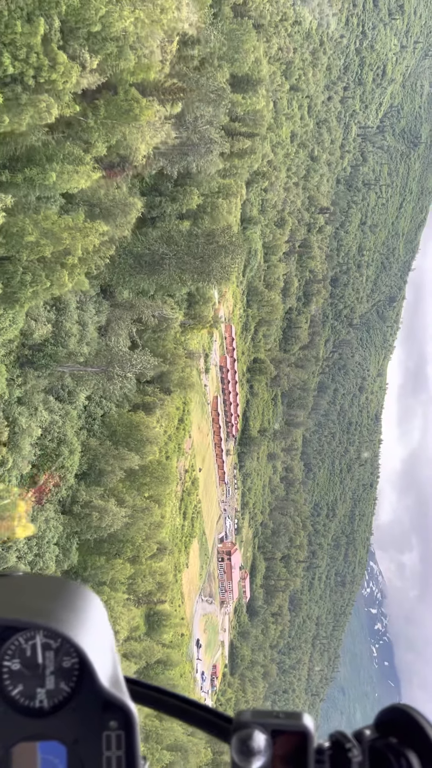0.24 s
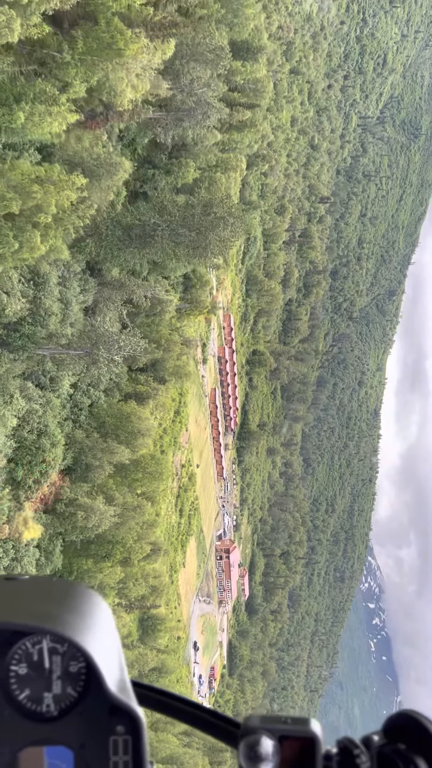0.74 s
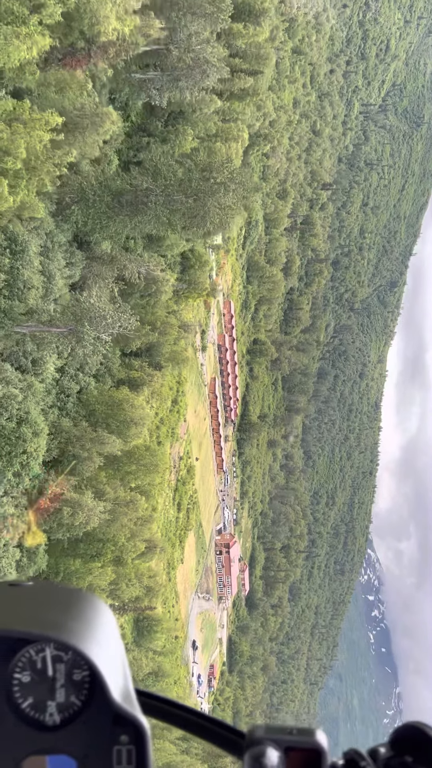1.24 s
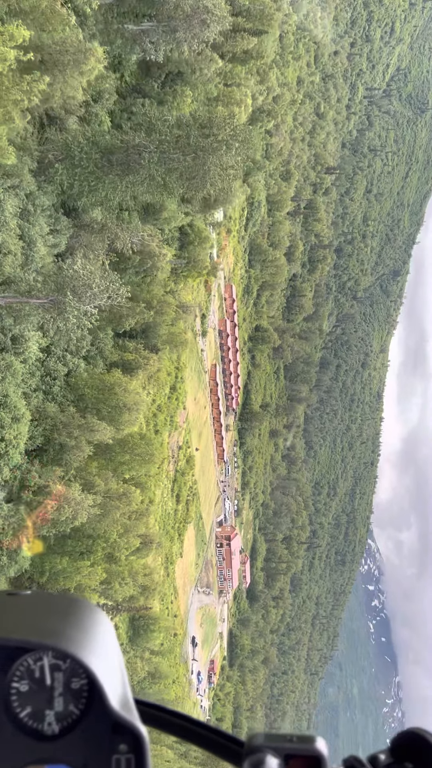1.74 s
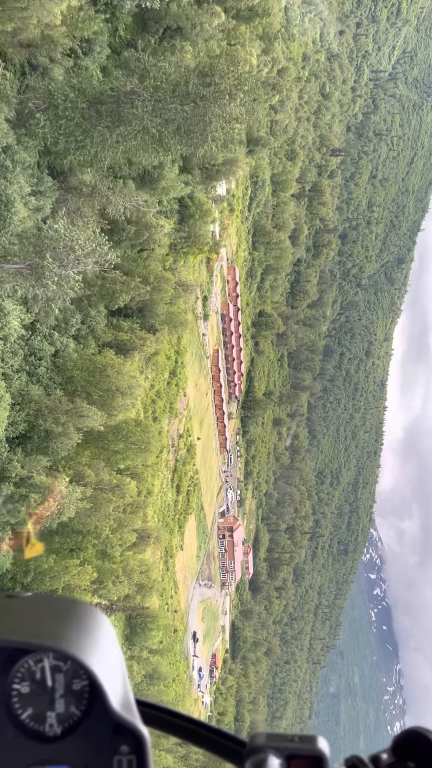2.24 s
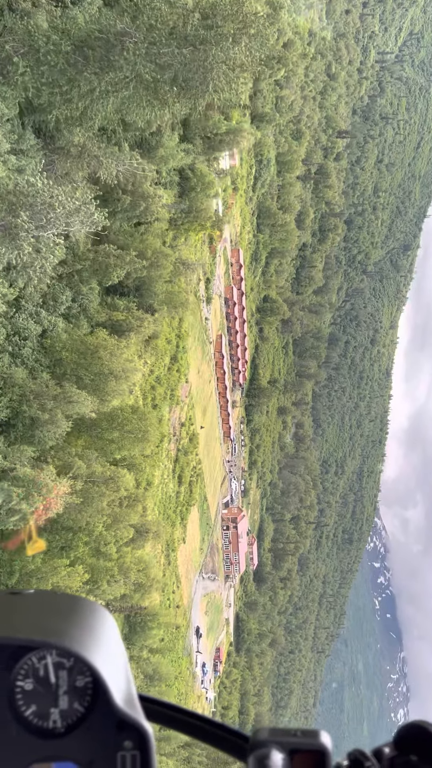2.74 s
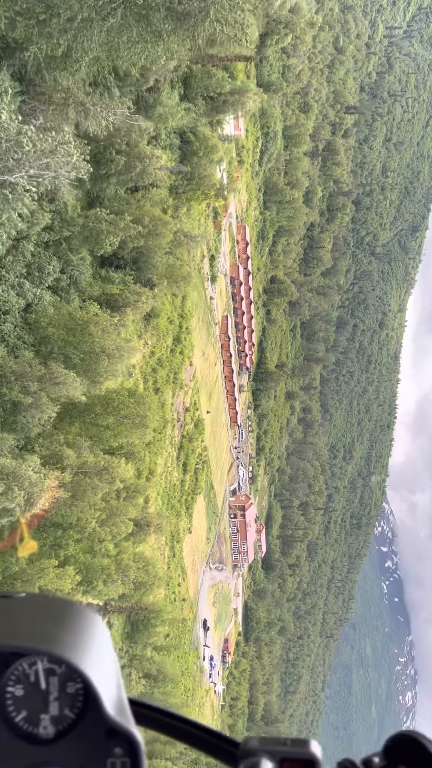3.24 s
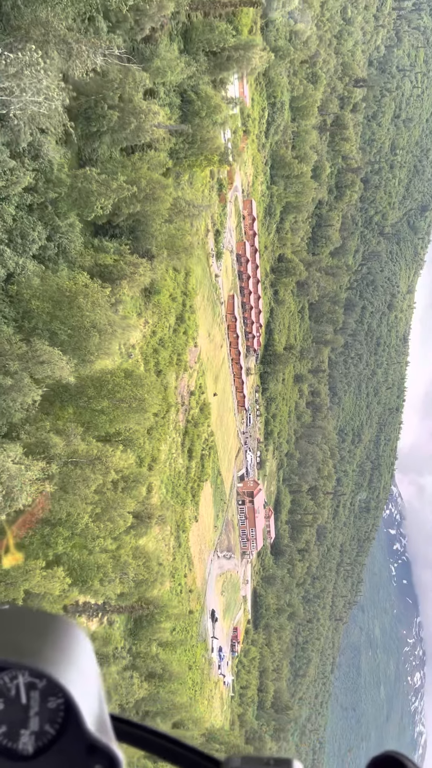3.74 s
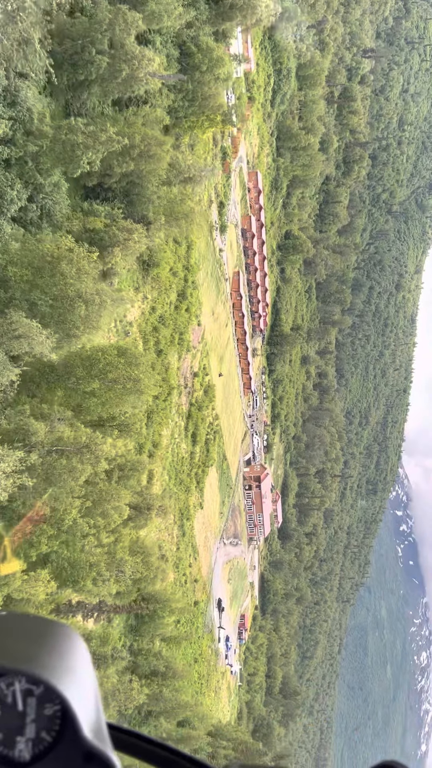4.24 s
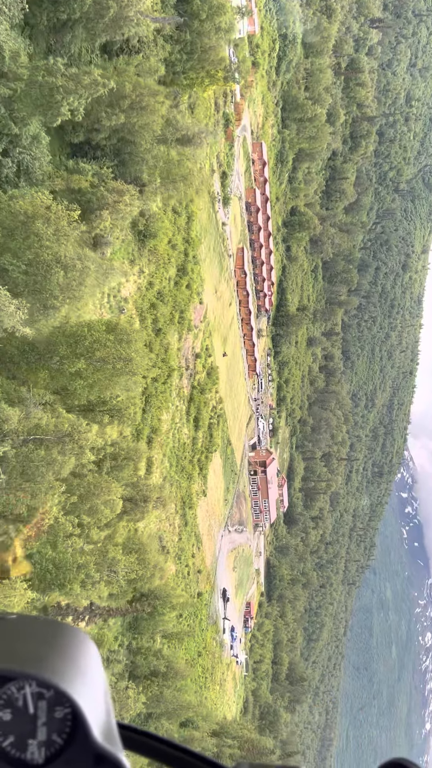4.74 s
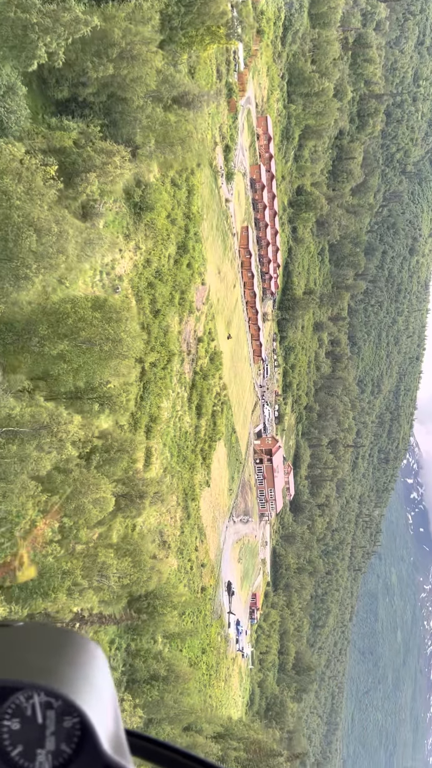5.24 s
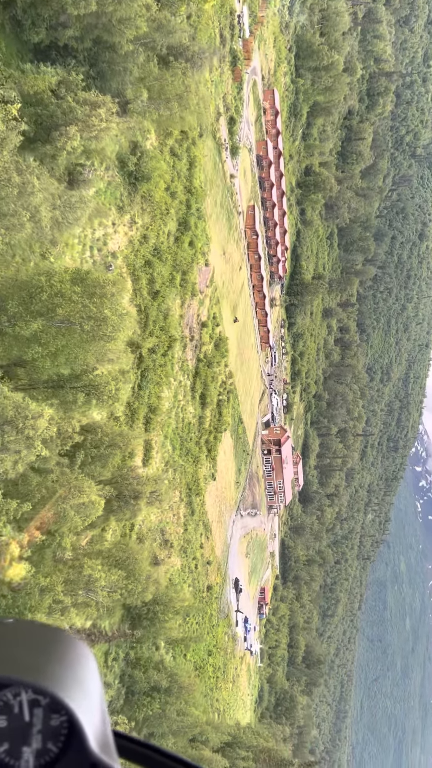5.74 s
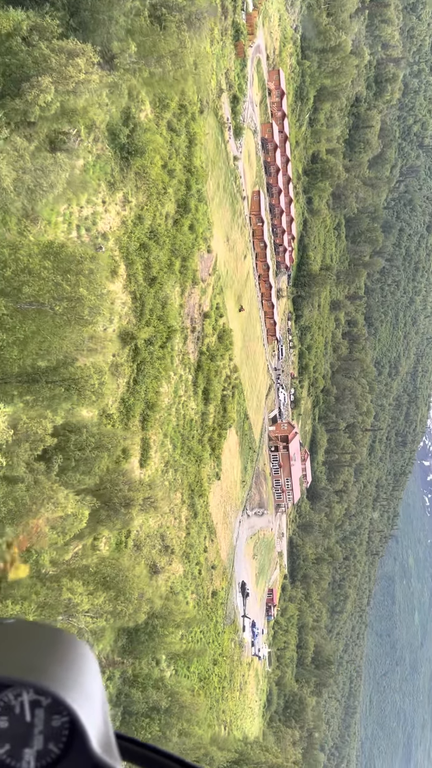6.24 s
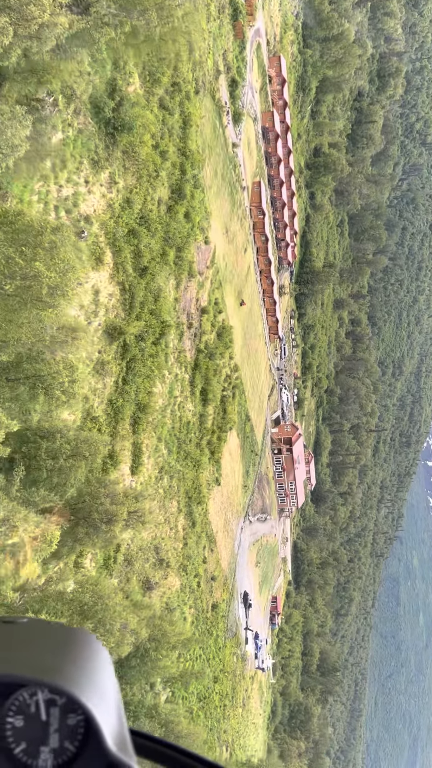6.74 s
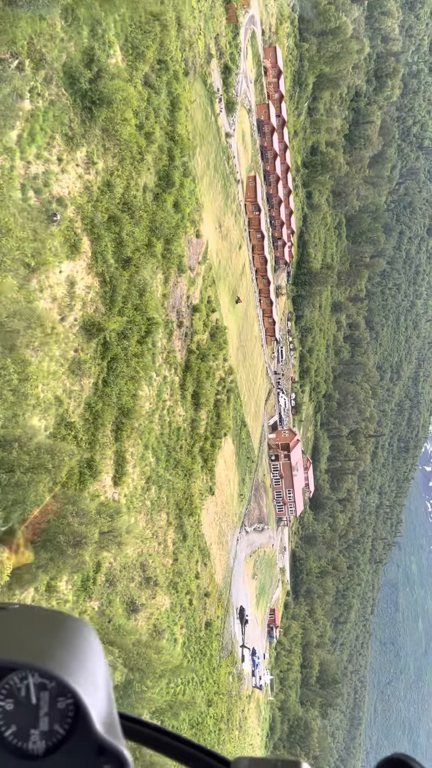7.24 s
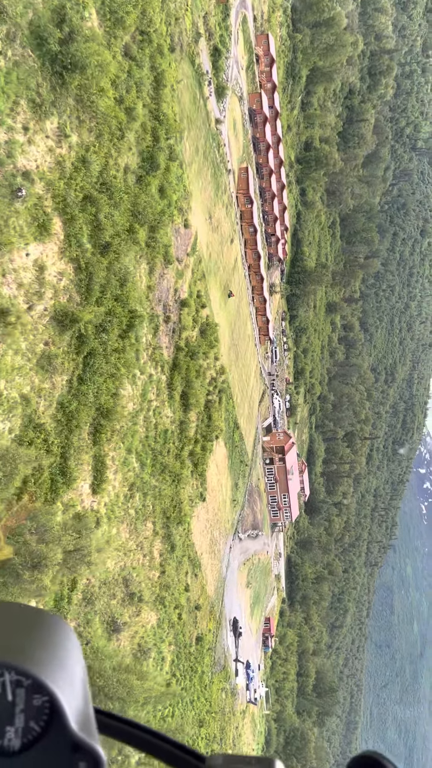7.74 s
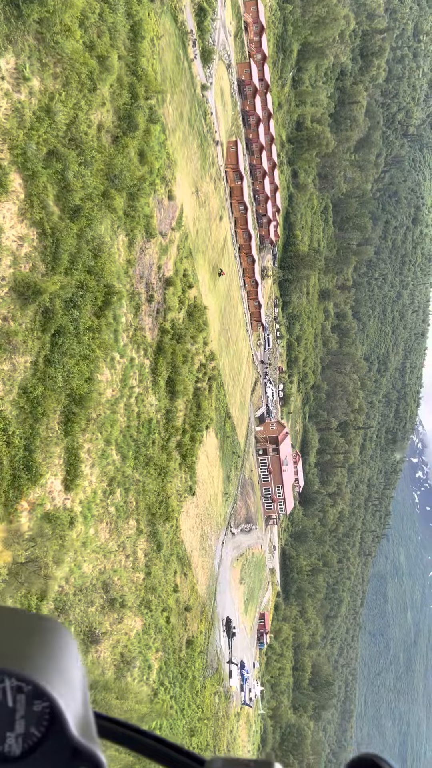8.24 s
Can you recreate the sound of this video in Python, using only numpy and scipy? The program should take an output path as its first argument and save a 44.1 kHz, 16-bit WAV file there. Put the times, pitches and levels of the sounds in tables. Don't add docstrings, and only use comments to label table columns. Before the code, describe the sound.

From 0 s we are in the cabin of a small piston helicopter, heard through a phone's two microphones. A loud, almost unchanging low engine hum dominates, roughened by fast rotor pulses, with a steady gear whine, faint high electrical whine, rapidly chattering panels and a low roar of turbulent air. Little changes at first; very faint blade slaps start around 2.5 s, and a longer rattle jolt comes near 3.1 s. At about 3.4 s power eases, and from about 3.8 s regular slaps, roughly thirteen or fourteen a second, become clear: hollow thumps with canopy ring and brief bright cracks. Their strength varies, with a strong burst and panel knocks around 6.3-6.5 s, then heavier runs near 7.1-7.5 s and 8.1 s. The low thumps deepen steadily while the engine pitch holds. It stops about 8.5 s, still in flight.

```python
import sys
import numpy as np
from scipy import signal
from scipy.fft import rfft, irfft, next_fast_len
from scipy.io import wavfile
from scipy.ndimage import uniform_filter1d, map_coordinates

SR = 44100
rng = np.random.default_rng(int(sys.argv[2]) if len(sys.argv) > 2 else 0)


def put_to_file(sound):
    columns = np.atleast_2d(sound).T
    safe = np.clip(columns, -1, 1)
    whole_steps = np.round(safe * 32767)
    wavfile.write(sys.argv[1], SR, whole_steps.astype(np.int16))


def decibels_to_gain(level_db):
    exponent = np.asarray(level_db, float) / 20
    return 10 ** exponent


N = 374850

# (time [s], level [dB])
FIRING_TONE = [(0.0, -15.5), (0.21, -16.5), (0.95, -14.5), (2.06, -15.5), (2.77, -13.5), (2.91, -13.5),
               (3.15, -17.5), (3.27, -14.5), (3.38, -17), (3.69, -15), (4.61, -16), (4.73, -18.5),
               (4.88, -16.5), (5.66, -17.5), (6.77, -15.5), (8.38, -16.5), (8.5, -21)]
FIRINGS_PER_BLADE, CYLINDERS = 10, 6
FLARE_S = 3.36
EVEN_SLAP_DB = -22


def unit(x):
    return x / np.sqrt(np.mean(x ** 2) + 1e-20)


def along(points, hz, column=1):
    table = np.transpose(points)
    return np.interp(np.log(hz + 1), np.log(table[0] + 1), table[column])


def curve(rows):
    s, values = np.transpose(rows)
    return np.interp(np.arange(N) / SR, s, values)


def flare(before, after):
    takes_s = 0.11
    return before + (after - before) / (1 + np.exp((FLARE_S - np.arange(N) / SR) / takes_s))


def wobble(rate):
    return map_coordinates(rng.standard_normal(int(N * rate / SR) + 4), [np.arange(N) * rate / SR])


def filtered(x, response):
    m = next_fast_len(N + SR // 2)
    tail = x[..., :-SR // 10:-1] * np.linspace(1, 0, SR // 10 - 1)
    x = np.concatenate([x, tail], axis=-1)
    return irfft(rfft(x, m) * response(np.fft.rfftfreq(m, 1 / SR)), m)[..., :N]


def resonances(modes):
    def response(f):
        total = 0
        for k, (centre, width, db) in enumerate(modes):
            damping = 1j * f * width
            total = total + (-1) ** k * decibels_to_gain(db) * damping / (centre ** 2 - f ** 2 + damping + 1e-9)
        return total
    return response


def orders(turns, table, drift_db, drift_rad):
    knots = np.arange(0, N + SR, SR // 3)
    total = np.zeros(N)
    for k, db in table:
        size, shift = [np.interp(np.arange(N), knots, rng.standard_normal(len(knots))) for _ in "ab"]
        angle = 2 * np.pi * (k * turns + rng.random()) + drift_rad * shift
        total += decibels_to_gain(db + 2.5 + drift_db * size) * np.cos(angle)
    return total


def airflow():
    # (frequency [Hz], density [dB per Hz])
    roar = [(22, -77), (32, -65.5), (42, -52.5), (60, -54.5), (130, -47.5), (230, -43.5), (300, -54.5),
            (500, -63), (650, -63), (820, -62.5), (1000, -67), (1300, -83.5), (1700, -82.5), (3000, -100)]
    z = signal.stft(rng.standard_normal((2, N)), nperseg=2048)[2]
    patches = rng.standard_normal(z.shape[1:])
    patches = uniform_filter1d(uniform_filter1d(patches, 5, 0), 5, 1)
    noise = unit(signal.istft(z * decibels_to_gain(1.8 * unit(patches)), nperseg=2048)[1][:, :N])
    return decibels_to_gain(flare(-2.5, -2.27)) * filtered(noise, lambda hz: np.sqrt(SR / 2) * decibels_to_gain(along(roar, hz)))


def rattle(firings):
    # (frequency [Hz], density [dB per Hz])
    panel_colour = [(600, -18.5), (1200, 13.5), (1900, 1), (2600, 5.5), (3400, 3), (4200, -3), (5000, -4),
                    (6500, -2), (8400, -3.5), (10000, -13.5), (11700, -0.5), (12600, -8), (14900, -2),
                    (15300, -13.5)]
    # (frequency [Hz], width [Hz], level [dB])
    trim = [(1920, 13, -5.5), (2423, 27, 0), (2925, 19, -2.5), (3610, 28, -1), (3940, 66, -10.5),
            (4810, 70, -5.5), (5580, 68, -11), (7300, 88, -5), (7400, 47, -14), (8850, 34, -11.5)]
    # (time [s], level [dB], length [s])
    jolts = [
        (0.1, -3, 0.11),
        (0.455, 1, 0.049),
        (3.115, 3, .15),
        (3.607, -1, 0.099),
        (3.708, 4, 0.018),
        (3.929, 3, 0.048),
        (5.534, -1.5, 0.033),
        (6.322, 5, 0.044),
        (6.461, 5, 0.017),
        (7.558, 0.5, 0.34),
    ]
    t = np.arange(N) / SR
    tone_db = curve(FIRING_TONE)
    level_db = flare(-58, -58.5) + 0.35 * (tone_db - tone_db.mean())
    for s, db, length in jolts:
        level_db += db * np.exp(-((t - s) / length) ** 2)
    cam = 2 * np.pi * (firings - .3) / CYLINDERS
    blade = 2 * np.pi * (firings - 3.6) / FIRINGS_PER_BLADE
    shake = 0.9 * np.cos(cam) + 1.1 * np.cos(2 * cam) + 0.13 * np.cos(4 * cam)
    shake += 0.43 * np.cos(cam) * np.cos(blade) + .5 * np.cos(blade)
    loose = decibels_to_gain(.6 * wobble(12) + 1.4 * wobble(30) + .6 * wobble(90))
    sharpness = flare(1.5, 1.1)
    gate = decibels_to_gain(1.22 * sharpness * shake) * loose
    fade = np.exp(-1 / (0.0015 * SR))
    gate = signal.lfilter([1 - fade], [1, -fade], gate ** 0.95) * decibels_to_gain(1.7 * wobble(600))

    def colour(hz):
        singing = sum(1.3 / (1 + (2 * (hz - c) / w) ** 2) * decibels_to_gain(0.37 * db) for c, w, db in trim)
        return decibels_to_gain(along(panel_colour, hz)) * (1 + singing)

    buzz = unit(filtered(gate * rng.standard_normal((2, N)), colour))
    return decibels_to_gain(level_db + 10) * buzz


def valve_train(firings):
    # (firing multiple [1], level [dB rms])
    valves = [(4, -56), (8, -63), (9, -66), (10, -67)]
    return orders(firings, valves, drift_db=2, drift_rad=4)


def gearbox(firings):
    # (mesh multiple [1], level under the mesh tone [dB])
    mesh_harmonics = [(1, 5.5), (2, -32), (3, -31)]
    # (frequency [Hz], level [dB rms])
    electric = [(9464, -83.5), (9736, -73.5)]
    teeth = 57
    turns = firings / FIRINGS_PER_BLADE / 2
    wander = .4 * wobble(5) + .3 * np.sin(2 * np.pi * turns)
    angle = 2 * np.pi * teeth * turns + wander
    mesh = sum(decibels_to_gain(db) * np.cos(k * angle) for k, db in mesh_harmonics)
    whine = sum(decibels_to_gain(db) * 2 ** .5 * np.cos(2 * np.pi * hz * np.arange(N) / SR) for hz, db in electric)
    uneven_db = .6 * np.sin(2 * np.pi * turns + 3.1) + .6 * wobble(6.4)
    return decibels_to_gain(flare(-42, -44.5) + 8 + uneven_db) * mesh + whine


def rotor(firings):
    # (blade-pass multiple [1], level [dB rms])
    blade_harmonics = [(2, -61), (3, -39.5), (4, -35.5), (6, -41.5), (7, -40.5), (8, -54.5), (9, -37.5),
                       (11, -38), (12, -32), (13, -56.5), (14, -47), (16, -41), (17, -58), (18, -59),
                       (19, -47.5), (21, -52), (22, -45.5), (23, -60), (24, -47), (26, -44), (27, -46),
                       (28, -46), (29, -55.5)]
    # (thirds of the blade rate [1], level [dB rms])
    between_tones = [(13, -50.5), (17, -38.5), (47, -40), (52, -38.5)]
    blades = firings / FIRINGS_PER_BLADE
    pressed = orders(blades, blade_harmonics, drift_db=2, drift_rad=.5)
    return pressed + orders(blades / 3, between_tones, drift_db=2.5, drift_rad=.5)


def cabin_thump(starts, wake_db):
    # (frequency [Hz], level [dB], t60 [s])
    air_modes = [(108, -10.5, 0.23), (173, -6, 0.043), (198, 3.5, .1), (258.2, -3, 0.072),
                 (321.8, 6, 0.039), (349, -2, 0.08)]
    deep_hz, deepens_db_per_s = 230, 1.13
    late = round(.002 * SR)
    t = np.arange(SR // 8) / SR
    hz, level_db, t60 = np.transpose(air_modes)[:, :, None]
    ringing = -decibels_to_gain(level_db - 60 * t / t60) * np.sin(2 * np.pi * hz * t) * (1 - np.exp(-t / .004))
    thump_db = flare(-28.5, -16.5)[starts] + 0.42 * (wake_db - EVEN_SLAP_DB)
    push = np.zeros(N + SR)
    for at, db in zip(starts, thump_db):
        deepening = decibels_to_gain((hz < deep_hz) * deepens_db_per_s * (at / SR - FLARE_S))
        push[at + late:][:len(t)] += decibels_to_gain(db) * np.sum(ringing * deepening, axis=0)
    return push[:N]


def canopy_slap(starts, slap_db):
    # (delay [s], level [dB])
    echoes = [(.0037, -4), (.0085, -9.5), (.013, -9), (.019, -13), (.026, -21)]
    # (frequency [Hz], width [Hz], level [dB])
    canopy_modes = [(332, 132, 0), (468, 76, 2), (542, 53, 4), (794, 88, 3.5), (1107, 134, -6.5),
                    (1300, 206, -12.5), (1775, 390, -25)]
    crack_late, crack_t60_s = round(.003 * SR), 0.055
    t = np.arange(SR // 8) / SR
    ring, crack = np.zeros((2, 2, N + SR))
    for at, db in zip(starts, slap_db):
        pulses = decibels_to_gain(-29 - 60 * t / .09) * rng.standard_normal((2, len(t)))
        pulses[:, 0] = 1
        for delay, echo_db in echoes:
            place = round((delay + rng.normal(0, .00012)) * SR)
            pulses[:, place] += decibels_to_gain(echo_db + rng.normal(0, 1, 2))
        ring[:, at:at + len(t)] += decibels_to_gain(db) * pulses
        hiss = decibels_to_gain(-60 * t / crack_t60_s) * rng.standard_normal((2, len(t)))
        crack_db = -45 + 1.5 * (db - EVEN_SLAP_DB)
        crack[:, at + crack_late:][:, :len(t)] += decibels_to_gain(crack_db) * (2 * pulses + hiss)
    canopy = lambda hz: resonances(canopy_modes)(hz) / (1 + 1j * hz / 3000)
    bright = lambda hz: resonances([(2100, 2200, 0)])(hz) ** 3
    return decibels_to_gain(35) * filtered(ring[:, :N], canopy) + filtered(crack[:, :N], bright)


def slaps(firings):
    # (time [s], slap peak [dB])
    wake = [(2.4, -28.5), (3.7, -31), (3.95, -18), (4.18, -23), (4.4, -19.5), (4.75, -24), (5.3, -21.5),
            (5.85, -21), (6.31, -14.5), (6.55, -27.5), (7.12, -17.5), (7.27, -18), (7.42, -17), (7.7, -20),
            (7.82, -33.5), (8.12, -15.5), (8.27, -30.5), (8.4, -21.5)]
    # (time [s], level [dB])
    strays = [(3.81, 2.5), (4.105, -1.5), (4.25, 3), (4.325, 3), (5.51, 2), (5.73, 3.5), (5.875, -2.5),
              (6.02, -2), (6.17, -4), (6.315, -0.5), (6.61, 4.5), (7.125, 3.5), (7.27, -1.5), (7.345, 2),
              (7.64, -2.5), (7.715, 4.5), (7.94, 3.5), (8.155, 5), (8.23, -4.5), (8.375, 2.5)]
    first_pass, last_pass = 33, 114
    slap_at_firing, slip_per_pass = 7.8, .012
    jitter_s = .0005
    high_blade_db = 1.5
    passes = np.arange(first_pass, last_pass + 1)
    due = passes * FIRINGS_PER_BLADE + slap_at_firing + slip_per_pass * (passes - first_pass)
    starts = np.searchsorted(firings, due)
    starts = starts + np.round(jitter_s * SR * rng.standard_normal(len(starts))).astype(int)
    wake_db = curve(wake)[starts]
    slap_db = wake_db - high_blade_db * (-1) ** passes
    for s, db in strays:
        slap_db[np.abs(starts - s * SR).argmin()] += db
    return cabin_thump(starts, wake_db) + canopy_slap(starts, slap_db)


def engine(firings):
    # (crank order [1], level [dB rms])
    crank_orders = [(1, -34.5), (1.5, -36), (2, -42.5), (2.5, -53.5), (3.5, -29.5), (4, -37), (4.5, -34.5),
                    (5, -42), (5.5, -37), (6.5, -49), (7, -63.5), (7.5, -41), (8, -45.5), (9, -49.5),
                    (9.5, -60.5), (10, -61.5), (10.5, -62.5), (11, -51.5), (13.5, -52.5), (18, -51.5)]
    angle = 2 * np.pi * firings
    tone = decibels_to_gain(curve(FIRING_TONE) + 5.0) * np.cos(angle)
    octave = -decibels_to_gain(flare(-37, -33.5) + 8.5) * np.cos(2 * angle + 0.067 * wobble(5.2))
    fifth = decibels_to_gain(flare(-39.5, -39.5) + 1.5 * wobble(4.9)) * np.cos(5 * angle + 0.17 * wobble(12))
    crank = orders(firings * 2 / CYLINDERS, crank_orders, drift_db=0.5, drift_rad=0.22)
    return tone + octave + fifth + crank


def ports(sound, other):
    # (frequency [Hz], left minus right [dB], left lag [rad], likeness [0-1])
    port_pair = [(50, -.4, .03, 1), (88, -2, 0.13, 0.9), (134.5, -2.5, 0.35, 1), (167, -14.5, 1.1, 0.95),
                 (293, -4.5, 0.65, .9), (323, -14.5, 1.22, 0.94), (443, -3.5, 2.28, 0.31),
                 (623, -2.5, 2.93, 0.89), (916, -2.5, 4.07, 0.96), (1170, -3.5, 3.74, 0.49),
                 (1580, 1.5, 5.96, 0.46), (2200, 0.5, 6.3, 0.72), (3140, -3.5, 6.3, 0.17),
                 (4640, 2, 7.43, 0.34), (6060, -1, 6.9, 0.8), (7100, -17.5, 6.3, 0.78),
                 (8100, -1, 7.8, 0.23), (10800, -1, 8.66, 0.94), (11300, 2, 9, 1), (12300, -2.5, 8.7, 1)]
    left = lambda hz: decibels_to_gain(along(port_pair, hz)) * np.exp(-1j * along(port_pair, hz, column=2))
    alike = lambda hz: np.clip(along(port_pair, hz, column=3), 0, 1)
    shared = filtered(sound, lambda hz: left(hz) * alike(hz))
    unrelated = filtered(other, lambda hz: left(hz) * np.sqrt(1 - alike(hz) ** 2))
    return np.array([shared + unrelated, sound])


def scene():
    # (time [s], firing rate [Hz])
    speed = [(0.0, 135.83), (0.5, 135.67), (1.0, 136.18), (1.5, 136.42), (2.0, 136.24), (2.5, 135.92),
             (3.0, 135.62), (3.5, 135.9), (4.0, 135.91), (4.5, 135.71), (5.0, 135.72), (5.5, 136.26),
             (6.0, 136.38), (6.5, 136.13), (7.0, 135.9), (7.5, 135.69), (8.0, 135.72), (8.5, 136.03)]
    firings = np.cumsum(curve(speed)) / SR
    noises = airflow() + rattle(firings) + slaps(firings)
    tones = gearbox(firings) + rotor(firings) + engine(firings)
    return ports(noises[0] + tones, noises[1] + .5 * tones) + valve_train(firings)


def low_pass(x):
    return signal.sosfilt(signal.butter(12, 15784, fs=SR, output="sos"), x)


def record(dry):
    # (frequency [Hz], level [dB])
    sum_kept = [(11000, 0), (11750, -2), (12200, -13), (12450, -80)]
    # (frequency [Hz], level [dB])
    difference_kept = [(5300, 0), (5800, -16), (7500, -26), (8300, -5), (9000, -6)]
    mid = filtered((dry[0] + dry[1]) / 2, lambda hz: decibels_to_gain(along(sum_kept, hz)))
    side = filtered((dry[0] - dry[1]) / 2, lambda hz: decibels_to_gain(along(difference_kept, hz)))
    return low_pass(np.array([mid + side, mid - side]))


dry = scene()
out = record(dry)
put_to_file(out)
```